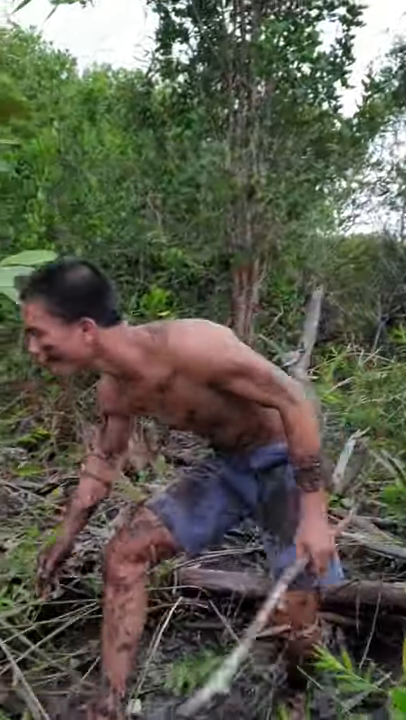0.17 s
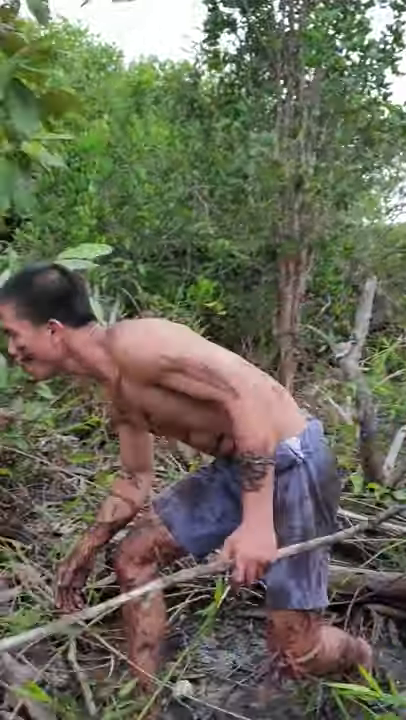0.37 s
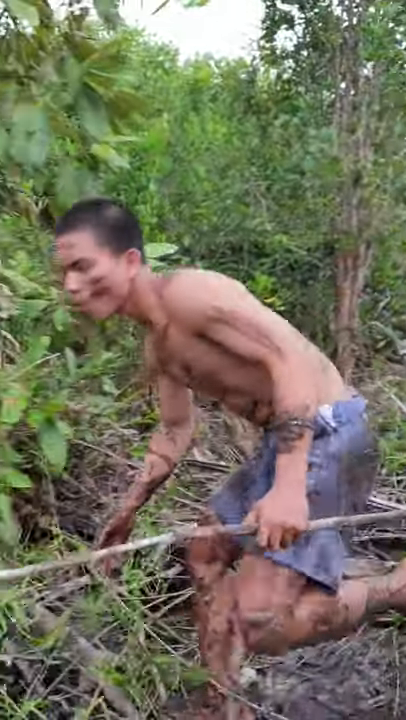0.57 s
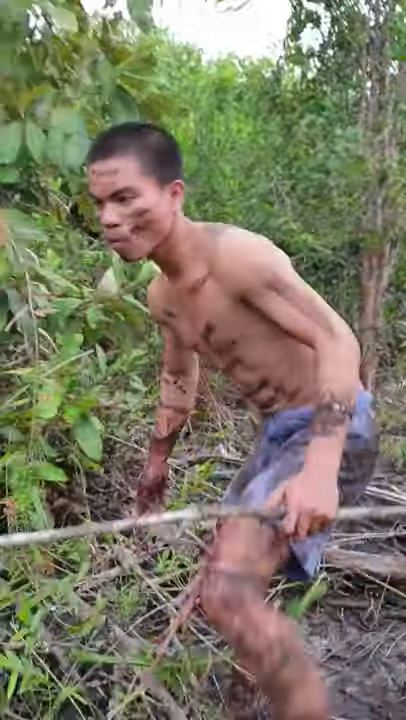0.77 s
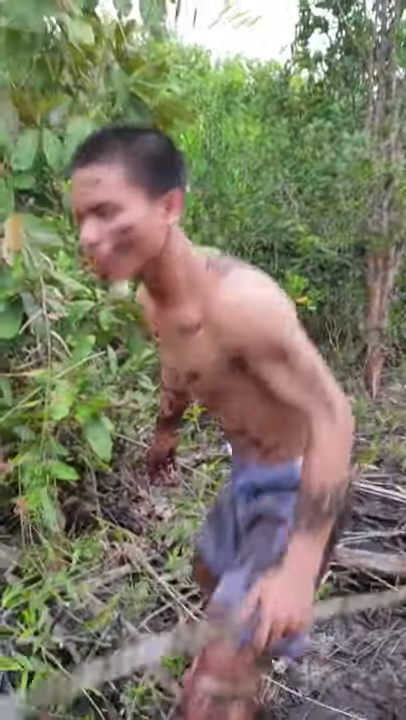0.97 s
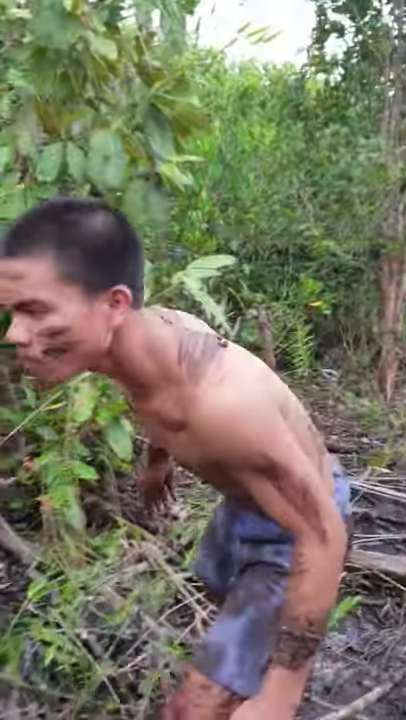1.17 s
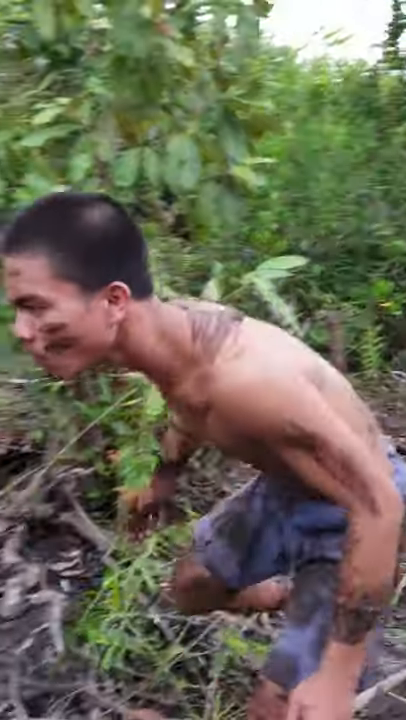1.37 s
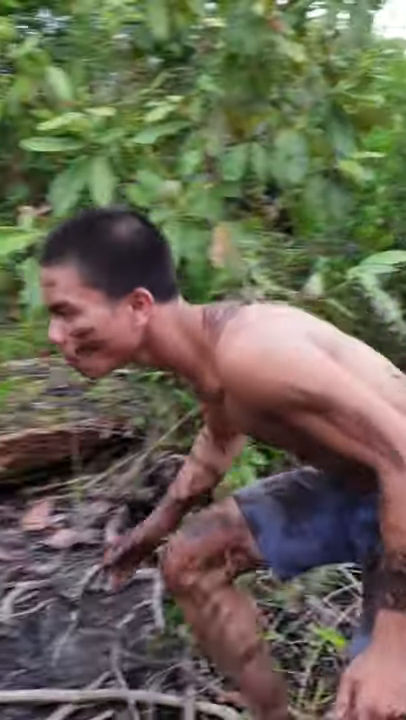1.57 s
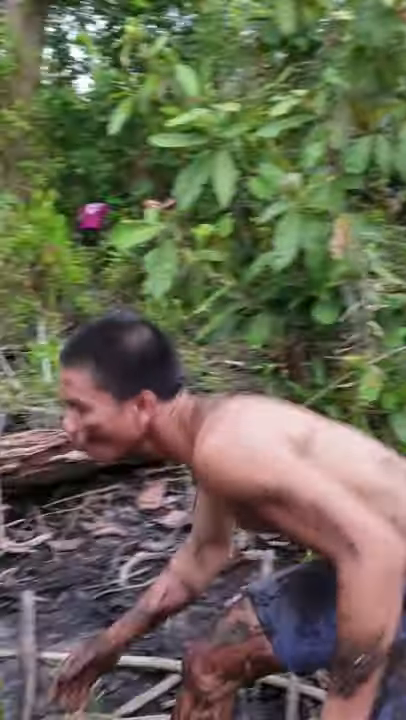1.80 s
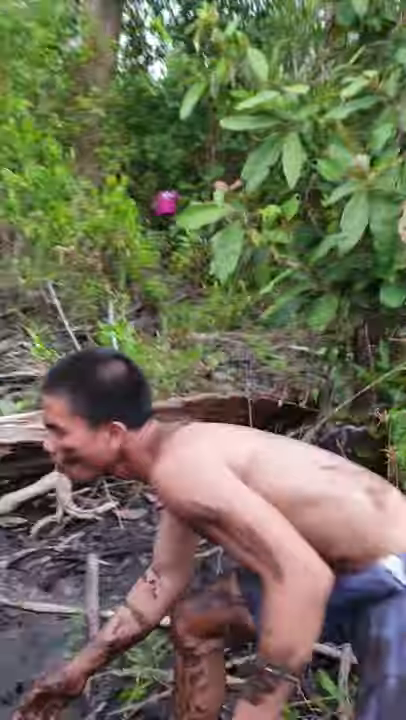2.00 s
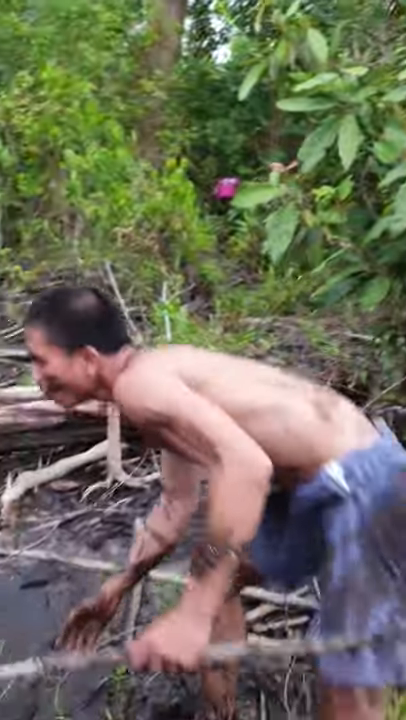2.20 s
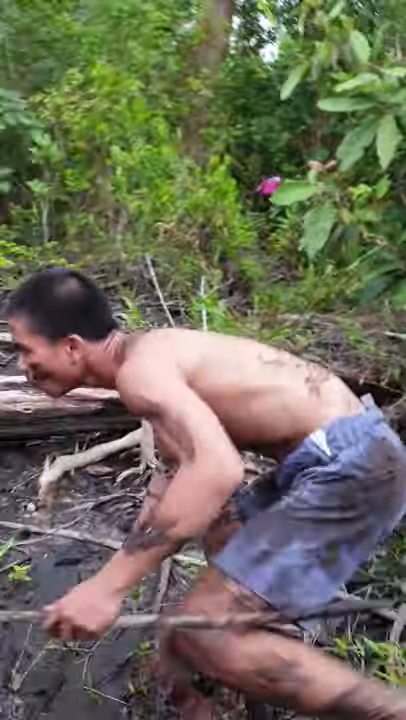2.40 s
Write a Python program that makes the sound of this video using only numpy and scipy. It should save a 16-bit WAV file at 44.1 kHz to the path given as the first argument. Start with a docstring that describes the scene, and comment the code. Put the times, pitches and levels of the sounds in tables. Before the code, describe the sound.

Loud dry twig cracks in three clusters, with leaf rustle and soft thumps of steps in mud

```python
"""A muddy thicket, where someone creeps close to a small two-port recorder.
Twigs snap as bursts of noise, a stick knocks on wood as rung-up sines, a foot thumps softly in the mud.
Leaves and litter rustle as hiss and crackle; a thin high tone wavers over the noise rumble of the open air.
The left port faces away: it is dull and hears a little later."""
import sys
import numpy as np
from scipy import signal
from scipy.fft import rfft, irfft, next_fast_len
from scipy.io import wavfile
from scipy.ndimage import uniform_filter1d

SR = 44100
rng = np.random.default_rng(int(sys.argv[2]) if len(sys.argv) > 2 else 0)


def to_linear_factor(level_db):
    """Convert decibel levels (scalar or array-like) to linear amplitude factors."""
    exponent = np.asarray(level_db, float) / 20
    return 10 ** exponent


def materialize(psi):
    """Save the field psi as 16-bit PCM at rate SR to the path in sys.argv[1].

    A 1-D psi becomes a single channel; in a 2-D psi each row is a channel.
    """
    bounded = np.clip(np.atleast_2d(psi).T, -1, 1)
    quanta = np.round(bounded * 32767).astype(np.int16)
    wavfile.write(sys.argv[1], SR, quanta)


N = 108045  # length in samples
TILT_PIVOT_HZ = 5830  # where dull meets bright, for snaps and rustle


def rms_one(x):
    """Scale to an average strength (rms) of 1."""
    return x / np.sqrt(np.mean(x ** 2) + 1e-20)


def at_hz(points, hz):
    """Read a table of (Hz, value) on a log-frequency axis."""
    table_hz, values = np.transpose(points)
    return np.interp(np.log(np.maximum(hz, 1)), np.log(table_hz), values)


def padded_size(x):
    """Transform length with room for a filter to ring out."""
    return next_fast_len(x.shape[-1] + 4096)


def frequencies(x):
    """Frequencies of the padded transform of x."""
    return np.fft.rfftfreq(padded_size(x), 1 / SR)


def colour(x, gain_db):
    """Filter x by a gain at each of its frequencies, with no sound ahead of its cause (minimum phase)."""
    size = padded_size(x)
    fold = irfft(np.log(to_linear_factor(gain_db)), size)
    # Folding the negative times onto the positive ones makes the filter causal.
    fold[..., 1:(size + 1) // 2] *= 2
    fold[..., size // 2 + 1:] = 0
    response = np.exp(rfft(fold))
    return irfft(rfft(x, size) * response, size)[..., :x.shape[-1]]


def spread(count):
    """Stereo white noise, alike in the bass and loose in the treble."""
    # How alike left and right are. Each row: frequency in Hz, likeness (1 = the same).
    likeness = [(20, 0.73), (300, 0.77), (1000, 0.087)]
    alike = np.clip(at_hz(likeness, np.fft.rfftfreq(count, 1 / SR)), 0, 1)
    mid, side = rfft(rng.standard_normal((2, count)))
    shared = np.sqrt(1 + alike) * mid
    opposed = np.sqrt(1 - alike) * side * [[1], [-1]]
    return irfft((shared + opposed) / np.sqrt(2), count)


def drift(rate):
    """Slow random wander of rms 1; a higher rate in Hz wanders faster."""
    r = np.exp(-2 * np.pi * rate / SR)
    noise = rng.standard_normal(N + SR)
    return rms_one(signal.lfilter([1], [1, -2 * r, r * r], noise)[SR:])  # skip the first second


def lumps(count, hold, spread_db):
    """A gain that jumps at random every `hold` samples."""
    steps = rng.standard_normal(count // hold + 1)
    return to_linear_factor(spread_db * np.repeat(steps, hold)[:count])


def rumble():
    """Open air: low lumpy noise, settling after a stronger start."""
    # Tone of the open air. Each row: frequency in Hz, gain in dB.
    air_tone = [(30, -28.5), (55, 2.5), (117, 1), (200, -12), (400, -38.5), (1000, -41)]
    settled_db, start_extra_db, settle_s, flicker_db = -63, 6.5, 0.36, 1.5
    raw = spread(N)
    start_db = start_extra_db * np.exp(-(np.arange(N) / SR / settle_s) ** 2)
    level = to_linear_factor(settled_db + start_db + flicker_db * drift(13))
    return level * rms_one(colour(raw, at_hz(air_tone, frequencies(raw))))


def whistle():
    """Thin whistle: a sine whose gliding pitch is summed into phase, fading in and out."""
    # Path of the pitch, smoothed below. Each row: time in seconds, pitch in Hz.
    pitch_path = [(1.385, 12350), (1.42, 13600), (1.465, 12450), (1.505, 13500), (1.555, 12250),
                  (1.62, 11800), (1.675, 10850), (1.715, 12500), (1.752, 11200), (1.78, 11400)]
    start_db, fade_db_per_s, flicker_db = -76, -16, 2.5
    s, hz = np.transpose(pitch_path)
    t = np.arange(N) / SR
    pitch = uniform_filter1d(np.interp(t, s, hz), size=1300)
    on = uniform_filter1d(1. * (t > s[0]) * (t < s[-1]), size=900)
    level = to_linear_factor(start_db + fade_db_per_s * (t - s[0]) + flicker_db * drift(26))
    tone = np.sqrt(2) * np.sin(2 * np.pi * np.cumsum(pitch) / SR)  # rms 1
    return on * level * tone


def crackle():
    """Litter crackle: short random ticks in clumps, each sounding in a band of its own."""
    # Edges of the overlapping bands, in Hz; each band runs from one edge to the next but one.
    band_edges = [700, 2000, 4000, 7000, 10500, 15500]
    ticks_per_s, clump_db, size_spread_db = 700, 5.0, 3.7  # the clumping sways the tick rate
    sizes = to_linear_factor(size_spread_db * np.minimum(rng.exponential(1, N), 4))
    born = rng.random(N) < ticks_per_s * to_linear_factor(clump_db * drift(25)) / SR
    band_of_tick = rng.integers(0, len(band_edges) - 2, N)
    noise = rng.standard_normal(N)
    out = 0
    for k, (low, high) in enumerate(zip(band_edges, band_edges[2:])):
        clicks = sizes * born * (band_of_tick == k)
        ticks = signal.lfilter([1], [1, -.95], clicks + 1e-18) * noise  # dying bursts of noise
        band = signal.butter(2, [low, high], "band", fs=SR, output="sos")
        out = out + signal.sosfilt(band, ticks)
    return rms_one(out)


def rustle():
    """Leaves and litter: hiss and crackle follow the motion in level and tilt, over a low shuffle."""
    # Motion in the leaves. Each row: time in seconds, level in dB,
    # treble lift and equal bass cut in dB, low shuffle level in dB.
    motion = [(0, -65, 5, -68), (0.128, -67.5, 5.5, -87), (0.149, -56.5, 2, -73), (0.45, -45.5, 4, -67),
              (0.578, -57, 6, -74), (0.65, -49.5, 4.5, -72), (0.78, -62, 5.5, -71.5), (0.868, -64, 6, -76),
              (0.932, -47.5, 3.5, -60.5), (1.2, -54.5, 4, -70.5), (1.29, -59, 5, -55.5),
              (1.42, -67, 5, -66.5), (1.498, -73, 6, -64.5), (1.774, -65.5, 5, -76), (1.8, -49.5, 4.5, -56),
              (1.93, -50, 1.5, -68.5), (2.059, -59, 5, -71.5), (2.201, -67.5, 2.5, -68.5),
              (2.246, -55, 0, -76), (2.29, -62.5, 10, -66.5), (2.45, -60.5, 9, -72.5)]
    # Tone of the leaves. Each row: frequency in Hz, gain in dB.
    leaf_tone = [(400, -17.5), (620, 6), (927, 3), (2500, 6.5), (4500, -3.5), (10500, -3.5), (12000, 2.5),
                 (14400, -5), (15500, -43.5)]
    # Tone of the low shuffle. Each row: frequency in Hz, gain in dB.
    shuffle_tone = [(90, -14.5), (160, 3.5), (350, -4.5), (800, -11), (2500, -38)]
    hiss_flicker_db, crackle_db, shuffle_flicker_db = 2.0, -4.5, 3.15
    s, db, slope_db, low_db = np.transpose(motion)
    t = np.arange(N) / SR
    hz = frequencies(t)
    raw = spread(N) * to_linear_factor(hiss_flicker_db * drift(24)) + to_linear_factor(crackle_db) * crackle()
    whole = rms_one(colour(raw, at_hz(leaf_tone, hz)))
    low_pass = signal.butter(2, TILT_PIVOT_HZ, fs=SR, output="sos")
    dull = signal.sosfiltfilt(low_pass, whole)
    bright = whole - dull
    slope = np.interp(t, s, slope_db)
    leaves = to_linear_factor(np.interp(t, s, db)) * (to_linear_factor(-slope) * dull + to_linear_factor(slope) * bright)
    shuffle_noise = rms_one(colour(spread(N), at_hz(shuffle_tone, hz)))
    shuffle = shuffle_noise * to_linear_factor(np.interp(t, s, low_db) + shuffle_flicker_db * drift(8.2))
    return leaves + shuffle


def thumps():
    """A foot in the mud: each low push swells and dies within a few cycles."""
    # Soft thumps. Each row: start in seconds, level in dB, pitch in Hz.
    steps = [(0.197, -48, 77), (0.418, -46.5, 95), (0.423, -50, 271), (0.505, -45, 282), (0.962, -50.5, 68),
             (1.805, -39.5, 314), (1.813, -44, 78), (2.289, -50, 77)]
    cycles_to_peak = 0.58
    out, t = np.zeros(N), np.arange(N) / SR
    for s, db, hz in steps:
        cycles = np.maximum(t - s, 0) * hz
        swell = cycles / cycles_to_peak
        envelope = np.e * swell * np.exp(-swell)  # peaks at 1
        out += to_linear_factor(db) * envelope * np.sin(2 * np.pi * cycles)
    return out


def ring(clicks, hz, t60):
    """One mode of the wood: a unit click sets off a sine of height 1 that falls 60 dB in t60 seconds."""
    r, w = to_linear_factor(-60 / (t60 * SR)), 2 * np.pi * hz / SR
    return signal.lfilter([0, np.sin(w)], [1, -2 * r * np.cos(w), r * r], clicks + 1e-18)


def knocks():
    """A stick on wood: each blow is a click and short rattle that rings modes damped by how the wood is held."""
    # Blows on thicker wood. Each row: start in seconds, level in dB, share of the free ring time.
    blows = [(0.177, -55, 1.5), (0.211, -43, 0.46), (0.253, -39.5, 0.74), (0.375, -57, 0.94),
             (0.953, -42.5, 1.2), (0.983, -36.5, 1.36), (1.809, -46, 0.78), (1.957, -53.5, 0.6)]
    # Modes of the wood. Each row: pitch in Hz, level in dB, free ring time in seconds to fall 60 dB.
    modes = [(650, 0, .06), (760, -2, .03), (1165, 0, .025), (1530, -1, .025), (2000, -3, .02)]
    rattle_s, level_spread_db = .006, 2.0
    size = 8000
    out = np.zeros(N + size)
    fade = np.exp(-np.arange(size) / (rattle_s * SR))
    for s, db, share in blows:
        i = int(s * SR)
        for hz, mode_db, t60 in modes:
            rattle = np.sqrt(2 * share / (rattle_s * SR))
            strike = fade * rng.standard_normal(size) * rattle
            strike[0] += 1
            gain = to_linear_factor(db + mode_db + level_spread_db * rng.standard_normal())
            out[i:i + size] += gain * ring(strike, hz, t60 * max(share, .05))
    return out[:N]


def tilt_db(hz, db_per_octave):
    """A slope through the pivot, flat below a third of it."""
    return db_per_octave * np.log2(np.maximum(hz / TILT_PIVOT_HZ, 1 / 3))


def snaps():
    """Twigs: fibres splinter for a few ms, then debris scatters; each twig has its own uneven colour."""
    # Snapping twigs. Each row: start in seconds, level in dB (before the shared trim),
    # treble tilt in dB per octave, debris tail in dB against the burst.
    twigs = [(0.2064, -8.5, -4.5, -12), (0.2531, -21.5, -6, -7.5), (0.3415, -21.5, 1.5, -6.5),
             (0.376, -29.5, -1.5, -1.5), (0.414, -3.5, -1.5, -14), (0.4522, -27.5, 2, -1),
             (0.514, -26.5, 3, -15), (0.939, -13, 3.5, -13), (0.9513, -12, -9, -17), (0.9708, -37, 5, -6),
             (0.977, -5.5, 0, -14), (1.0416, -5, 1, -13), (1.152, -34, 4.5, -17), (1.219, -38, -14, -10),
             (1.2909, -38, -8, -6), (1.7895, -35, 8.5, 0), (1.807, -19.5, 0.1, -15.5),
             (1.8156, -27, -7, -13), (1.852, -34, -2, -3.5), (1.88, -36, -7, -9), (1.891, -34, 1, -5.5),
             (1.953, -28.5, -2.5, -10.5), (2.144, -38, 5, -21), (2.394, -36.5, 11, -18),
             (2.419, -34.5, 18, -25)]
    # Tone shared by the twigs. Each row: frequency in Hz, gain in dB.
    twig_tone = [(300, -21), (1590, -5.5), (3630, 1.5), (6790, 1), (8280, -2.5), (8990, 0.5), (11900, 4),
                 (14500, -4.5), (15500, -34)]
    rise_s, fall_s, tail_rise_s = .0007, .0017, .001
    tail_t60_s, late_db, late_t60_s = 0.074, -11, 0.32  # a quick tail and a weaker, longer one
    trim_db, splinter_db, debris_db, ripple_spread_db = -7.5, 0.5, 2.8, 1.5
    size = 16000
    out, t = np.zeros((2, N + size)), np.arange(size) / SR
    burst = (1 - np.exp(-(t / rise_s) ** 2)) * np.exp(-t / fall_s)
    burst /= burst.max()
    tail = to_linear_factor(-60 * t / tail_t60_s) + to_linear_factor(late_db - 60 * t / late_t60_s)
    tail *= 1 - np.exp(-t / tail_rise_s)
    bass_cut = signal.butter(4, 2200, "high", fs=SR, output="sos")
    hz = frequencies(t)
    for s, db, slope_db, tail_db in twigs:
        noise = rng.standard_normal(size) + 2.0 * spread(size)  # part is the same on both sides
        fibres = noise * lumps(size, 20, splinter_db) * burst
        fibres *= np.sqrt(2 * np.sum(burst ** 2) / np.sum(fibres ** 2))  # same energy for every burst
        fibres = signal.sosfilt(bass_cut, fibres)
        debris = to_linear_factor(tail_db) * tail * lumps(size, 60, debris_db) * spread(size)
        ripple = ripple_spread_db * rng.standard_normal(60)
        ripple_db = np.interp(hz, np.linspace(0, SR / 2, 60), ripple)
        gain_db = at_hz(twig_tone, hz) + tilt_db(hz, slope_db) + ripple_db
        coloured = colour(fibres + debris, gain_db) / np.sqrt(np.mean(to_linear_factor(2 * gain_db)))
        i = int(s * SR)
        out[:, i:i + size] += to_linear_factor(db + trim_db) * coloured
    return out[:, :N]


def scene():
    """All sources at the recorder, from the background to the twigs."""
    return rumble() + whistle() + rustle() + thumps() + knocks() + snaps()


def top_cut(x):
    """Nothing passes above the cut-off."""
    return signal.sosfilt(signal.butter(12, 15760, fs=SR, output="sos"), x)


def record(dry):
    """The ports share the power by their balance, the left one lags; peaks are rounded and the top is cut."""
    # Left port over right port. Each row: frequency in Hz, difference in dB.
    port_balance = [(60, -2.2), (740, 1.2), (2200, 1.5), (3330, -2.5), (4600, -12), (6500, -16),
                    (7200, -27), (8200, -28), (8900, -15), (13300, -20), (14500, -28)]
    left_lag_s, overload_at, cutoff_hz = 0.00016, .88, 15300
    balance_db = at_hz(port_balance, frequencies(dry))
    right_db = -10 * np.log10((1 + to_linear_factor(2 * balance_db)) / 4)  # keeps the summed power of the ports even
    left, right = colour(dry, np.array([right_db + balance_db, right_db]))
    left = np.interp(np.arange(N) - left_lag_s * SR, np.arange(N), left)
    rounded = overload_at * np.tanh(np.array([left, right]) / overload_at)
    mix = signal.sosfilt(signal.cheby2(8, 30, cutoff_hz, fs=SR, output="sos"), rounded)
    return top_cut(mix)


dry = scene()
out = record(dry)
materialize(out)
```